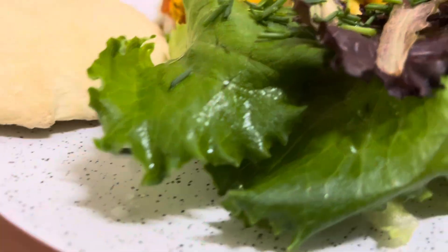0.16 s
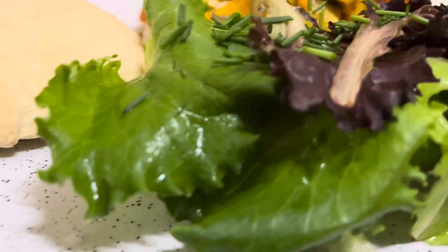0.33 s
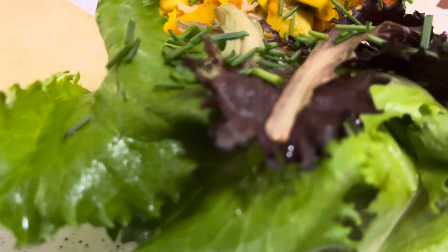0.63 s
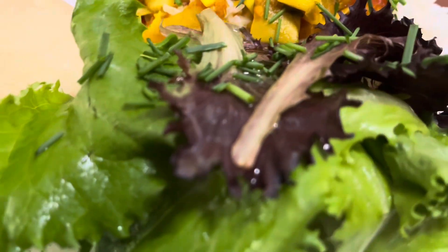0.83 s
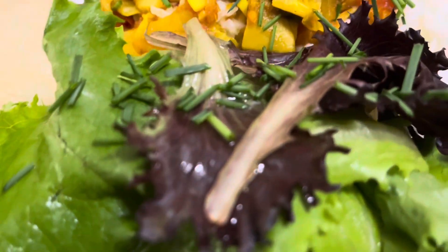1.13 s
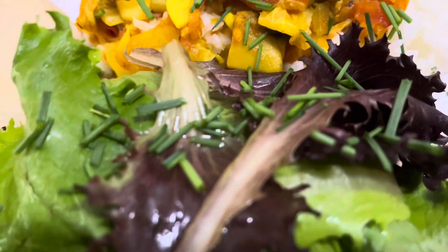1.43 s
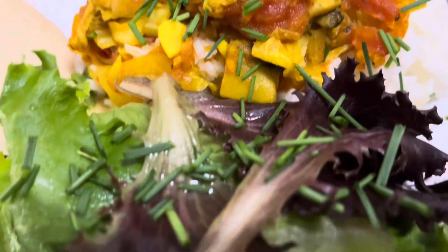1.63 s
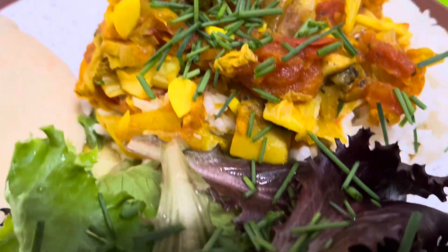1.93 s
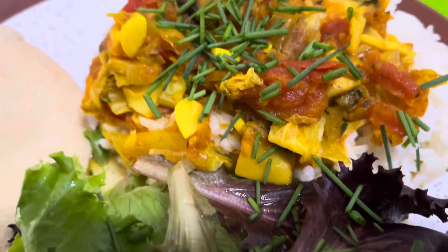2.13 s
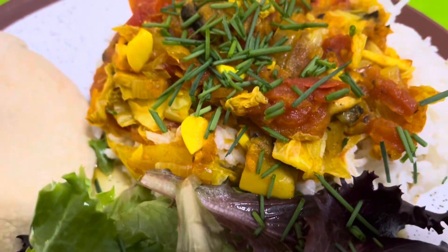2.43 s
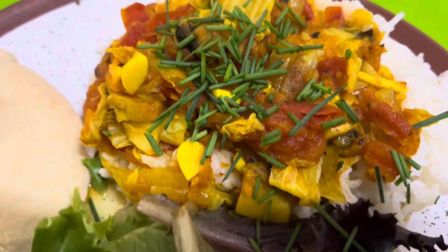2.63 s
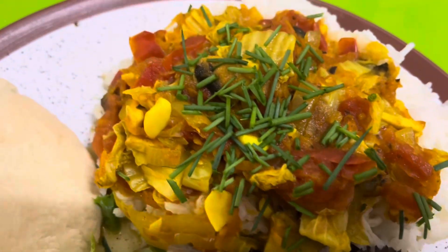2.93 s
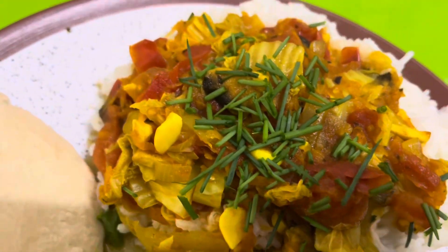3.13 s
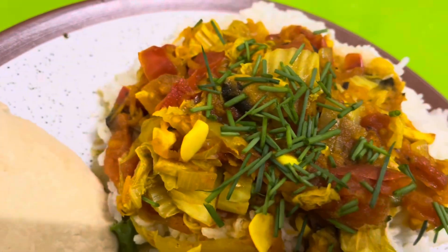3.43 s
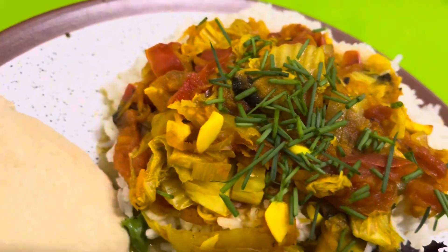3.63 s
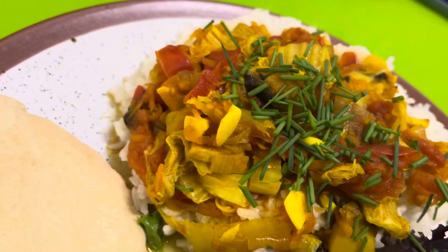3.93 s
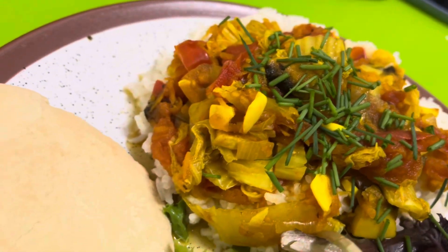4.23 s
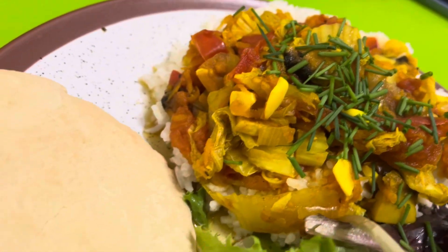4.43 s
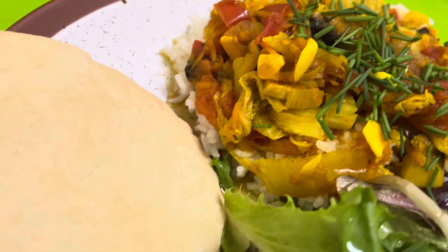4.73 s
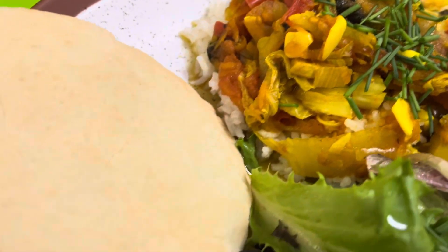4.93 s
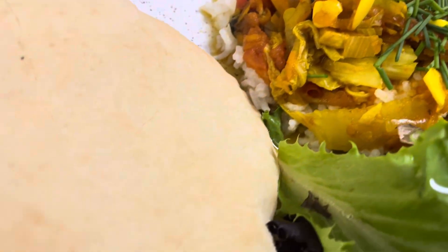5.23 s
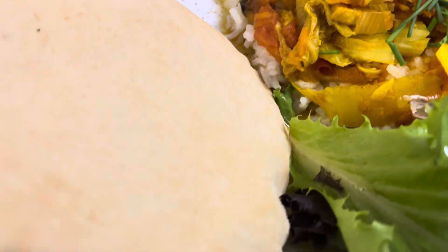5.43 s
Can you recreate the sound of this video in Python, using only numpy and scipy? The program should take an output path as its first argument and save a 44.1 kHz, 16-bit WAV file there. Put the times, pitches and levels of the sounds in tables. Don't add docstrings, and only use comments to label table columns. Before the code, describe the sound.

A phone close to the table hears low ventilation rumble and hiss with slight cloth stirs. Fork or knife taps on china ring very briefly at uneven gaps, mixed with duller knocks of nearby objects. Early on a tine skids with a rough, tonal squeak. The hardest clink comes late, then a dull set-down and faint knocks near the end. Small room, quick reverberation.

```python
import sys
import numpy as np
from scipy import signal
from scipy.fft import rfft, irfft, next_fast_len
from scipy.io import wavfile
from scipy.ndimage import uniform_filter1d

SR = 44100
rng = np.random.default_rng(int(sys.argv[2]) if len(sys.argv) > 2 else 0)


def unload_wav(signal):
    wavfile.write(
        sys.argv[1],
        SR,
        np.round(np.clip(np.atleast_2d(signal).T, -1, 1) * 32767).astype(np.int16),
    )


def nominal_scale(level):
    x = np.asarray(level, float) / 20
    return 10 ** x


N = 245501
T = np.arange(N) / SR

# frequency in Hz, density in dB per Hz.
HISS_SPECTRUM = [(22, -76), (35, -72), (65, -64), (125, -69.5), (250, -74), (600, -79.5), (1000, -86.5),
                 (2000, -98.5), (4500, -104), (6500, -113), (7800, -111), (9500, -123), (11700, -122),
                 (15000, -134)]
# centre in seconds, treble lift in dB, half length in seconds.
CLOTH_STIRS = [
    (0.21, 10, 0.46),
    (1.315, 16.5, 0.067),
    (2.65, 1.5, 0.68),
    (3.395, 2, 0.18),
    (4.55, -13.5, .2),
    (5.05, -2, 0.13),
]
# frequency in Hz, level in dB, 60 dB decay in seconds.
BOARD_MODES = [(1610, 8, .008), (1860, 4, .012), (2800, -2, 0.018)]
FORK_MODES = [(4600, -12, 0.018), (5150, 5, 0.034), (5310, -4, 0.042)]
BOWL_MODES = [(1400, -4, 0.026), (1455, -0.5, .033), (2906, -7, .05), (5160, -7, 0.019)]
MUG_MODES = [(1697, 1.5, 0.018), (1572, -10.5, 0.073), (3080, -17, 0.029), (771, -23, 0.085),
             (446, -13.5, 0.027)]
PLATE_LOW_MODES = [(1094, 0.0052, 0.025)]
# start in seconds, level in dB, ring over contact noise in dB,
# treble tilt in dB per octave.
KNOCKS = [
    [(.42, -30.5, -21, -18.5), (.436, -33, -11, -40), (5.274, -33, 0, -16.5), (5.29, -39.5, -2, -28.5)],
    [(1.364, -39, -15, -10), (2.686, -40.5, 1, -4.5), (2.774, -43, 1, -16), (3.185, -56, -3, -13)],
    [(3.306, -35.5, 15, -5), (3.322, -35.5, 18, -2.5)],
    [(4.864, -20.5, 14, -4.5), (4.89, -27.5, 3, -4)],
    [(4.25, -24, 16.5, -22.5)],
]
# peak in seconds, level in dB.
WHISTLE_PEAKS = [
    (.875, -76.5),
    (1.05, -60),
    (3.96, -68),
]
# start in seconds, peak in dB, spot from 0 centre to 1 rim,
# hardness tilt in dB per octave, contact noise in dB.
TAPS = [
    (0.929, -18, 0.43, 0.5, -0.5),
    (2.291, -16.5, 0.36, 0, 0.5),
    (2.663, -22.5, 0.96, 2, 1),
    (2.749, -21.5, 0.71, 1, 5),
    (3.315, -25, 0.33, -13.5, -10),
    (4.252, -11, .01, -2, 0),
]
# frequency in Hz, level in dB, 60 dB decay in seconds.
PLATE_FAMILIES = [
    [(1126, 8, 0.14), (943, -5.5, 0.038)],
    [(1740, -2, 0.02), (1920, 2.5, 0.022), (1879, 7.5, 0.034)],
    [(2660, -7.5, 0.09), (2800, 2, 0.054), (2904, 8.5, 0.03)],
    [(3466, -8.5, 0.026), (3680, -9.5, 0.02), (4250, -12.5, 0.0056)],
    [(5072, 0, 0.067), (5186, 4.5, 0.058), (4890, -5, 0.016)],
    [(11040, 12, 0.022), (10996, -4, 0.09), (10650, -27, 0.036)],
    [(7840, -1.5, 0.046), (9410, -6, 0.072), (9730, -12, .03), (11970, -15.5, .03), (12460, -7, 0.046),
     (14650, -3.5, 0.03)],
]
# level struck at the centre in dB, gain toward the rim in dB.
SPOT_RESPONSE = [
    (-26.5, 12.5),
    (-18.5, 0),
    (-13, -9),
    (-9.5, -9),
    (-13, -5.5),
    (-13, -15),
    (-13.5, -5.5),
]
# frequency in Hz, level in dB.
CONTACT_SPECTRUM = [(500, -26), (1000, -7.5), (1800, -3.5), (2300, -19.5), (3000, -0.5), (4200, -4),
                    (5600, -14.5), (6500, -21), (7500, -21.5), (9000, -8.5), (12000, -19), (13600, -30),
                    (15000, -29), (16200, -25.5)]
# time in seconds, slip rate in Hz, pressure in dB.
SKID = [
    (1.378, 1490, -76.5),
    (1.39, 1456, -28),
    (1.404, 1421, -12),
    (1.424, 1400, -17),
    (1.455, 1400, -12.5),
    (1.482, 1394, -12.5),
    (1.505, 1442, -13.5),
    (1.533, 1395, -18),
    (1.56, 1392, -42),
]
# frequency in Hz, level in dB.
TINE_RADIATION = [(350, -51), (705, -11), (1050, -19), (1410, 3.5), (1760, -28), (2115, -19), (2460, -7.5),
                  (2820, -12), (3520, -16.5), (4200, -17.5), (5640, -20), (6500, -34.5), (8400, -23.5),
                  (14200, -71)]
# frequency in Hz, 60 dB decay in seconds.
ROOM_DECAY = [(500, 0.3), (1400, 0.27), (3000, 0.23), (6000, 0.24), (12000, 0.16)]
# frequency in Hz, difference minus sum in dB, likeness 0 to 1,
# phase of the difference in radians.
PORTS = [(40, -25, .1, -12), (207, -15, 0.07, 3.5), (410, -0.5, 0.3, .5), (690, -3, 0.1, 1.5),
         (1400, 2, 0.3, -3.5), (2520, -3.5, 0.66, 1.65), (3500, -1, .6, 0.5), (4280, -2, 0.58, 0.8),
         (5610, -3, 0.76, -1), (6360, 0.5, .55, 2), (7640, 8.5, 0.9, -3), (8000, 20.5, 0.4, -6.5),
         (8580, 24, 0.4, -0.5), (9720, 2.5, 0.9, 2), (10560, -21, 1, 1.5), (11350, -3.5, 0.5, 2),
         (12600, -45, 0.4, 0.5), (13040, -14, 0.7, -3), (14800, 8.5, 0.64, -1.5), (15840, 30.5, .3, -4)]


def curve(rows, t):
    s, *columns = np.transpose(rows)
    return [np.interp(t, s, c) for c in columns]


def on_hz(hz, rows, order=1):
    rows = np.array(rows)
    return np.interp(np.log(np.maximum(hz, 1)), np.log(rows[:, 0]), rows[:, order])


def colour(x, rows):
    size = x.shape[-1]
    return irfft(rfft(x) * nominal_scale(on_hz(np.fft.rfftfreq(size, 1 / SR), rows)), size)


def walk(rate, size=N):
    k = int(SR / rate)
    steps = np.repeat(rng.standard_normal(size // k + 1), k)
    return 1.3 * uniform_filter1d(uniform_filter1d(steps, k), k)[:size]


def ring(t, hz, t60, phase):
    decay = np.exp(-np.log(1000) * t / t60)
    return np.sin(2 * np.pi * hz * t + phase) * decay * np.minimum(t * hz / 2, 1)


def switch(t, s):
    return .5 + .5 * np.tanh((t - s) / 0.0063)


def add(out, s, sound):
    i = int(s * SR)
    out[i:i + len(sound)] += sound[:N - i]


def hiss():
    size = next_fast_len(N)
    noise = rfft(colour(rng.standard_normal((2, size)), HISS_SPECTRUM)) * np.sqrt(SR / 2)
    octave = np.log2(np.maximum(np.fft.rfftfreq(size, 1 / SR), 1) / 20)
    lift_db = sum(db * np.exp(-((T - s) / half) ** 2) for s, db, half in CLOTH_STIRS)
    out = 0
    for k in range(11):
        band = np.cos(np.pi / 2 * np.clip(octave - k, -1, 1)) ** 2
        treble_share = np.clip((k - 6.5) / 5.1, 0, 1)
        db = .5 * walk(1.97) + treble_share * lift_db
        out = out + nominal_scale(db) * irfft(noise * band, size)[:, :N]
    return out


def knocks():
    out, t = np.zeros(N), T[:SR // 8]
    envelope = np.exp(-t / 0.0053) * np.minimum(t / 0.0018, 1)
    bodies = (BOARD_MODES, FORK_MODES, BOWL_MODES, MUG_MODES, PLATE_LOW_MODES)
    for body, rows in zip(bodies, KNOCKS):
        modes = sum(nominal_scale(db) * ring(t, hz, t60, 0) for hz, db, t60 in body)
        for s, db, ring_db, tilt_db in rows:
            shape = [(250, -25), (700, -4), (1500, 0), (3500, tilt_db / 2),
                     (12000, 3 * tilt_db), (13500, 6 * tilt_db)]
            burst = colour(rng.standard_normal(len(t)), shape) * envelope
            add(out, s, nominal_scale(db) * (nominal_scale(ring_db - 4) * modes + 3 * burst))
    return out


def whistle():
    rise_db_s, fall_db_s = 900, 109.5
    swells = [top - np.where(T < s, rise_db_s * (s - T), fall_db_s * (T - s)) for s, top in WHISTLE_PEAKS]
    db = np.max(swells, axis=0) + 2.5 * walk(40)
    hz = 11800 * (1 + .002 * walk(30))
    return nominal_scale(db) * np.sin(2 * np.pi * np.cumsum(hz) / SR)


def plate():
    contact_s, contact_db, ring_db = 0.0016, 8, 3
    out, t = np.zeros(N), T[:SR // 8]
    for s, db, spot, tilt_db, noise_db in TAPS:
        shape = [(hz, v + tilt_db * np.log2(hz / 3000)) for hz, v in CONTACT_SPECTRUM]
        contact = colour(rng.standard_normal(len(t)), shape) * np.exp(-t / contact_s)
        modes = np.zeros(len(t))
        for (centre_db, rim_db), family in zip(SPOT_RESPONSE, PLATE_FAMILIES):
            for hz, mode_db, t60 in family:
                hardness_db = tilt_db * max(np.log2(hz / 2500), 0)
                level_db = centre_db + spot * rim_db + hardness_db + mode_db + rng.standard_normal()
                modes += nominal_scale(level_db) * ring(t, hz, t60, 2 * np.pi * rng.random())
        add(out, s - .005, nominal_scale(db) * (nominal_scale(ring_db) * modes + nominal_scale(contact_db + noise_db) * contact))
    return out


def squeal():
    halves_from_s, halves_db = 1.413, 0
    quarters_from_s, quarters_to_s, quarters_db = 1.428, 1.472, -2.5
    sharp_from_s, dull_from_s = 1.415, 1.4544
    early_edge_db, sharp_db, dull_db = 0, 2.5, -2.5
    judder_hz, judder_climb_hz_s, judder_db, judder_rough = 42, 500, 2.5, .005
    slip_wander, slip_flutter_db, scrape_db = .0015, 2.5, -19

    out, t = np.zeros(N), SKID[0][0] + T[:SR // 5]
    hz, db = curve(SKID, t)
    sharp, late = switch(t, sharp_from_s), switch(t, dull_from_s)
    half_db = halves_db - 45 * (1 - switch(t, halves_from_s))
    quarter_db = quarters_db - 45 * (1 - switch(t, quarters_from_s)) - 25 * switch(t, quarters_to_s)
    edge_db = early_edge_db + (sharp_db - early_edge_db) * sharp + (dull_db - sharp_db) * late

    hops = t - SKID[5][0]
    throb = np.cos(2 * np.pi * hops * (judder_hz + judder_climb_hz_s * hops / 2))
    db = db + late * judder_db * (throb - .5)
    waver = (slip_wander + late * judder_rough) * walk(150, size=len(t))
    quarter_turn = 2 * np.pi * np.cumsum(hz * (1 + waver)) / SR / 4

    slips = nominal_scale(scrape_db) * colour(rng.standard_normal(len(t)), CONTACT_SPECTRUM)
    for k in range(1, 42):
        odd_db = quarter_db - k / 3
        share_db = (0, odd_db, half_db, odd_db)[k % 4] + edge_db * max(np.log2(k / 4), 0)
        line_db = on_hz(k * np.median(hz) / 4, TINE_RADIATION) + slip_flutter_db * walk(110, size=len(t))
        slips += nominal_scale(share_db + line_db) * np.sin(k * quarter_turn + 2 * np.pi * rng.random())
    add(out, t[0], slips * nominal_scale(db) * (t < SKID[-1][0]))
    return out


def room(x):
    rise_s, early_db, early_s, patchy_db = 0.0041, 10, 0.0067, 2.5
    t = T[:SR // 2]
    noise, hz = rfft(rng.standard_normal((2, len(t)))), np.fft.rfftfreq(len(t), 1 / SR)
    echo = 0
    for k, (_, t60) in enumerate(ROOM_DECAY):
        band = on_hz(hz, [(f, j == k) for j, (f, _) in enumerate(ROOM_DECAY)])
        echo = echo + irfft(noise * band, len(t)) * np.exp(-np.log(1000) * t / t60)
    echo = echo * np.minimum(t / rise_s, 1) ** 2 * nominal_scale(early_db * np.exp(-t / early_s))
    echo = echo * nominal_scale(patchy_db * walk(700, size=len(t)))
    echo = echo / np.sqrt(np.mean(np.sum(echo ** 2, axis=1)))
    return signal.fftconvolve(x[None], echo, axes=1)[:, :N]


def scene():
    air = hiss()
    impacts = room(knocks() + plate())
    skid = whistle() + squeal()
    lag = 9
    straight = nominal_scale(-5) * np.array([skid, np.roll(skid, lag)])
    return impacts + nominal_scale(-10.5) * room(skid) + straight + air


def band_limit(x):
    return signal.sosfilt(signal.butter(12, 16330, fs=SR, output="sos"), x)


def record(dry):
    size = next_fast_len(N)
    hz = np.fft.rfftfreq(size, 1 / SR)
    one, other = rfft(dry, size)
    angle = np.arctan(nominal_scale(on_hz(hz, PORTS, order=1)))
    like = np.clip(on_hz(hz, PORTS, order=2), 0, 1)
    turned = np.exp(1j * on_hz(hz, PORTS, order=3)) * one
    mid = np.cos(angle) * one
    side = np.sin(angle) * (like * turned + np.sqrt(1 - like ** 2) * other)
    mix = irfft(np.array([mid + side, mid - side]), size)[:, :N]
    return band_limit(mix)


dry = scene()
out = record(dry)
unload_wav(out)
```